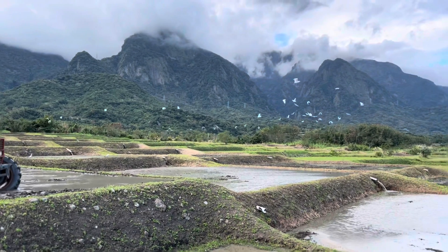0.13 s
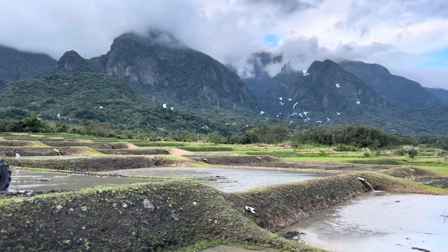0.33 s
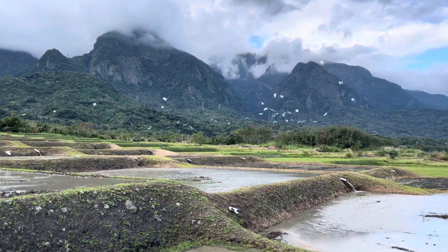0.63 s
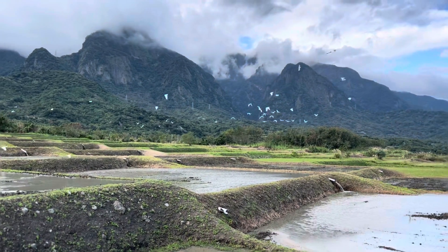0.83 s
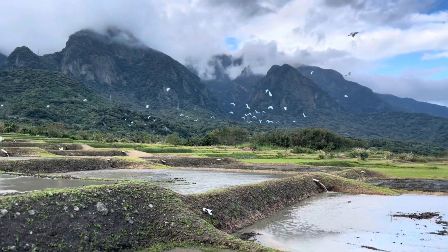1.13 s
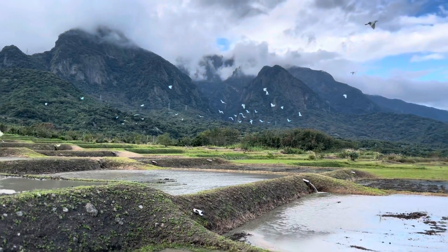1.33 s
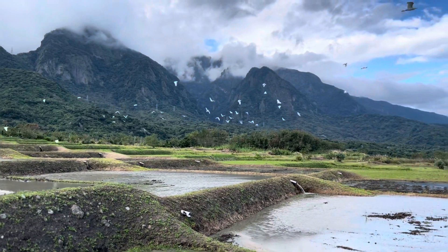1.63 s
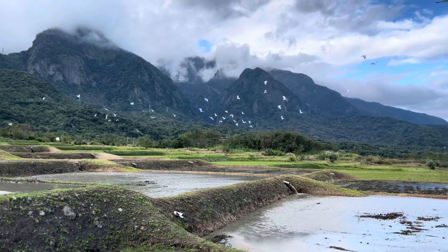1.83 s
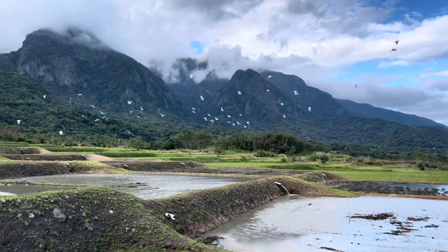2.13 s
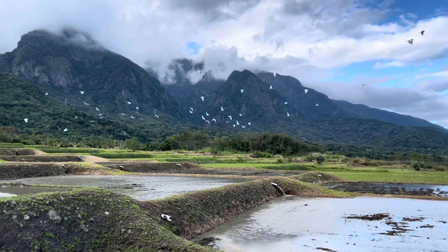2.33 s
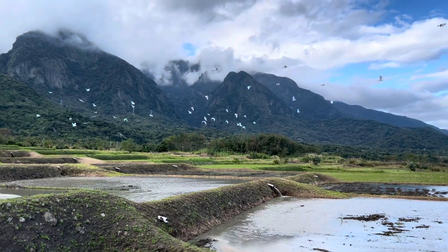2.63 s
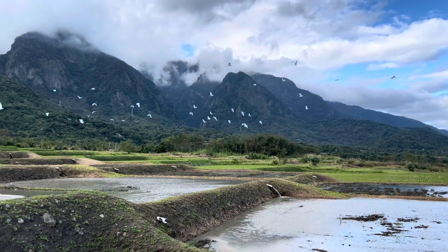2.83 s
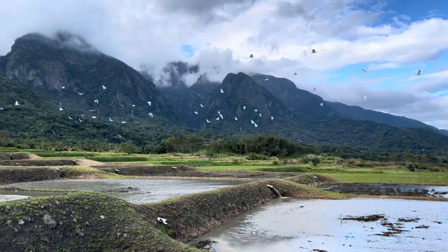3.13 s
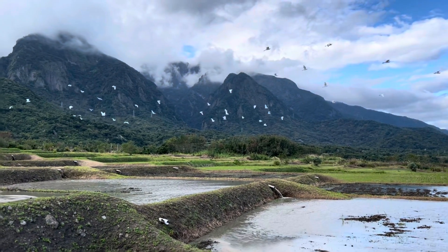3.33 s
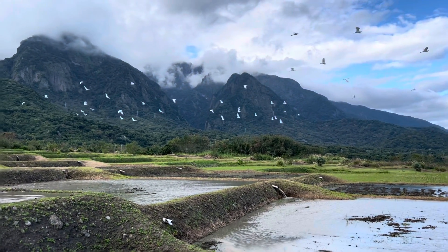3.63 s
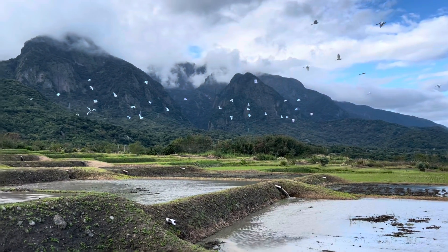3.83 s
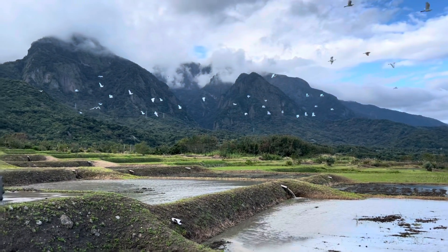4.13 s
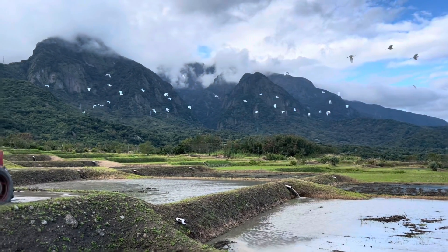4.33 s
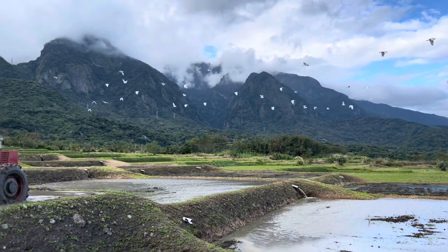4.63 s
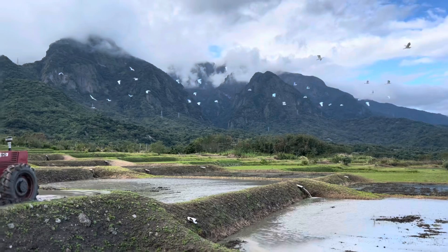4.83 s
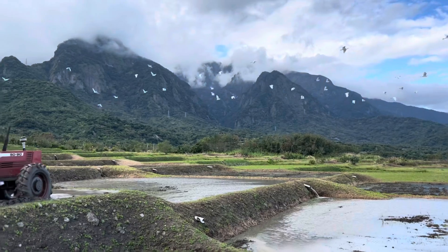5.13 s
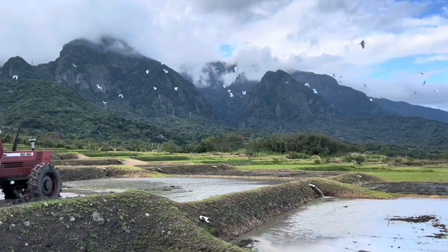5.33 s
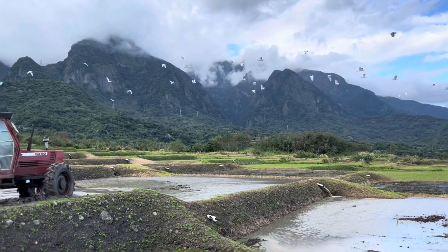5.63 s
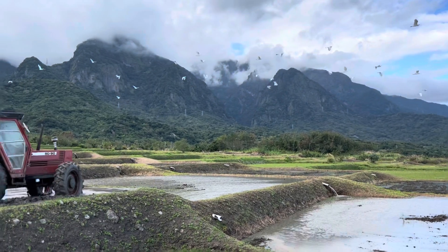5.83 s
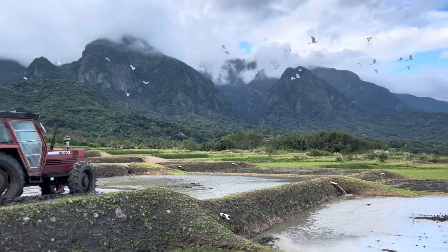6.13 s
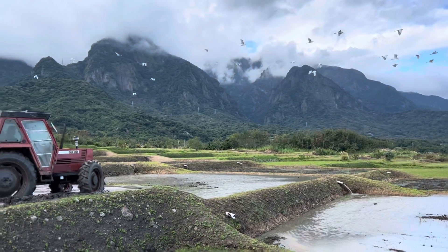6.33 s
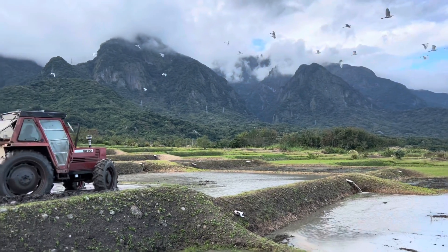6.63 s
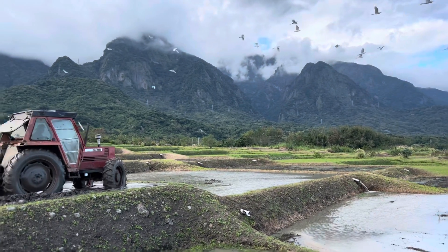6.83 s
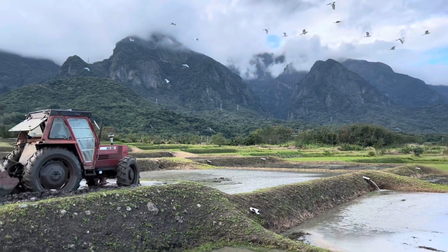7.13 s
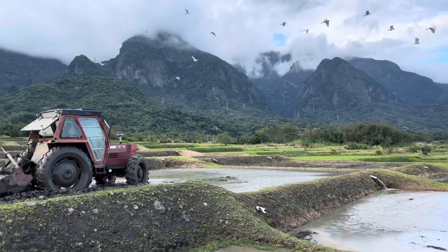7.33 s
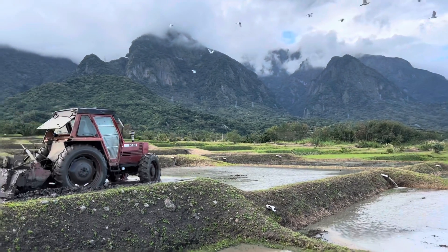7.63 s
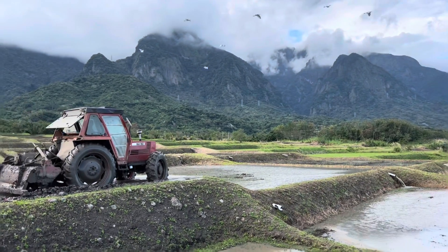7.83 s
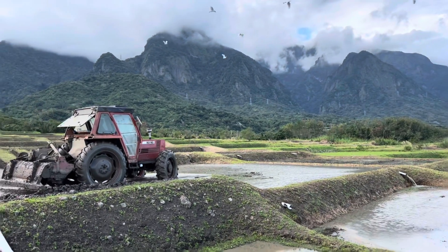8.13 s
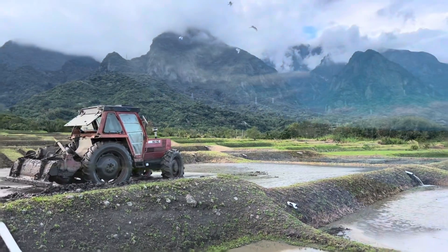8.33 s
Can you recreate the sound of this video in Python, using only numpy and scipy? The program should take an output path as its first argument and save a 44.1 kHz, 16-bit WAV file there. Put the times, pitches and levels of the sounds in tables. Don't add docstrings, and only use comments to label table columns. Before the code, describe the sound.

Wind noise dominates from 0 s: gusts press on a small stereo microphone with low rumble, fluttering roar, dull thumps and sharp little cracks, especially strong around 0.4-1.1 s, and at about 2.2 s. Underneath, a diesel tractor works continuously at a distance in a flooded field, leaning left. Its deep notes are masked, leaving a fast, steady pulsing hiss, mid-range block hum, metallic rattle and a smooth fine spray of thrown water. Wind eases somewhat after 2.5 s but keeps snapping and thudding, with dips near 2.6 and 4.3 s. From roughly 5 s the gears take load, whining narrowly, and the casing rings brighter in short flares, heaviest around 6.6 s. After 7.3 s the load eases and the tractor hiss fades, while short strong gusts near 7.4 and 8.1 s alternate with sudden lulls until the end at 8.5 s.

```python
import sys
import numpy as np
from scipy import signal
from scipy.fft import rfft, irfft, next_fast_len
from scipy.io import wavfile
from scipy.ndimage import uniform_filter1d

SR = 44100
rng = np.random.default_rng(int(sys.argv[2]) if len(sys.argv) > 2 else 0)


def decibels_to_gain(level_db):
    exponent = np.asarray(level_db, float) / 20
    return 10 ** exponent


def store_pcm(level_fs):
    pcm = np.round(np.clip(level_fs, -1, 1) * 32767).astype(np.int16)
    wavfile.write(sys.argv[1], SR, np.atleast_2d(pcm).T)


N = 374850
SIZE = next_fast_len(N)
HZ = np.maximum(np.arange(SIZE // 2 + 1) * SR / SIZE, 1)


def rms_one(x):
    return x / np.sqrt(np.mean(x ** 2) + 1e-20)


def in_time(rows):
    s, *columns = np.transpose(rows)
    return [np.interp(np.arange(N) / SR, s, c) for c in columns]


def at_hz(points, hz, column=1):
    points = np.array(points)
    return np.interp(np.log(hz), np.log(points[:, 0]), points[:, column])


def swells(rows):
    s, half_s, first_db, second_db = np.transpose(rows)[..., None]
    t = np.arange(0, N + 64, 64)
    hump = np.cos(np.clip((t / SR - s) / half_s, -1, 1) * np.pi / 2) ** 2
    return [np.interp(np.arange(N), t, np.sum(db * hump, axis=0)) for db in (first_db, second_db)]


def drift(rate_hz):
    r = np.exp(-40 * np.pi * rate_hz / SR)
    slow = signal.lfilter([1], [1, -2 * r, r * r], rng.standard_normal(N // 20 + 4002))[4000:]
    return np.interp(np.arange(N) / 20, np.arange(len(slow)), rms_one(slow))


def resonance(x, hz, width_hz):
    r = np.exp(-np.pi * width_hz / SR)
    return signal.lfilter([(1 - r * r) / 2, 0, (r * r - 1) / 2],
                          [1, -2 * r * np.cos(2 * np.pi * hz / SR), r * r], x)


def ringing(noise, hz, width_hz):
    return rms_one(resonance(resonance(noise, hz, width_hz), hz, width_hz))


# [pitch_hz, share in step (leans left), share a quarter
LEAN = [(60, .02, 0.48), (200, .05, 0.51), (500, 0.37, 0.64), (780, 0.56, 0.36), (1100, -0.15, 0.3),
        (1300, -0.43, -0.011), (1860, 0.24, -0.25), (2300, -0.13, -.5), (2860, 1, 1), (3300, 1, .2),
        (3600, 0.67, -.4), (3950, .1, 0), (4400, -0.23, .5), (4870, -0.0098, -.4), (5300, 0.41, -.2),
        (5700, 0.92, 0), (6300, 0.6, -.3), (7000, -.1, .3), (7600, 0, .1), (8200, .05, -.6),
        (8800, .02, -.5), (10000, .02, 0), (11300, .02, .5), (12200, .02, .5), (16000, .02, 0)]


def ports(mid_db, side_db, side_gain_db, gate=1, lean=LEAN):
    first, second = rfft(rng.standard_normal((2, N)) * gate, SIZE)
    tied = at_hz(lean, HZ) + 1j * at_hz(lean, HZ, column=2)
    tied = tied / np.maximum(abs(tied), 1)
    free = np.sqrt(np.clip(1 - abs(tied) ** 2, 0, 1))
    inside = (HZ > mid_db[0][0]) & (HZ < mid_db[-1][0])
    mid = decibels_to_gain(at_hz(mid_db, HZ)) * inside
    side = decibels_to_gain(at_hz(side_db, HZ) + side_gain_db) * inside * (tied * first + free * second)
    return np.array([mid * first + side, mid * first - side]) / np.sqrt(np.mean(mid ** 2))


def heard(spectra):
    return irfft(spectra, SIZE)[..., :N]


def band(spectra, low_hz, high_hz):
    place = np.log(HZ / low_hz) / np.log(high_hz / low_hz)
    return heard(spectra * np.sin(np.pi * np.clip(place, 0, 1)))


def two_ports(x, lag_ms, lean_db):
    late = np.interp(np.arange(N) - lag_ms * SR / 1000, np.arange(N), x)
    return np.array([x * decibels_to_gain(lean_db), late * decibels_to_gain(-lean_db)])


def bursts(per_s, spread_db, fade_s):
    born = rng.random(N) < per_s * decibels_to_gain(3.5 * drift(18)) / SR
    sizes = decibels_to_gain(spread_db * np.minimum(rng.exponential(1, N), 3.0))
    return rms_one(signal.lfilter([1], [1, -np.exp(-1 / (fade_s * SR))], born * sizes + 1e-18))


def evened(x, over_s, share):
    power = uniform_filter1d(np.mean(x ** 2, axis=0), size=round(over_s * SR))
    return x * (power / np.mean(power) + 0.023) ** (-share / 2)


# [time_s, level_db, brightness_db]
WIND = [(0.0, -7.5, 2.2), (0.65, -18, 7), (1.31, -12, 6), (1.96, -17, 7), (2.62, -12, 4), (3.27, -11, 3.5),
        (3.92, -21, 6.5), (4.58, -18, 6.5), (5.23, -18, 5.5), (5.88, -22.5, 6), (6.54, -16.5, 2),
        (7.19, -20.5, 4), (7.85, -22.5, 1.5), (8.5, -19, 3.5)]
# [middle_s, half_length_s, level_db,
# brightness_db]
GUSTS = [(0.579, 0.16, 5.5, 1), (0.808, 0.019, 9.5, -1.5), (0.993, 0.04, 5, -2), (1.626, 0.043, 3, -0.5),
         (1.686, 0.091, 4.5, -3), (1.771, 0.034, 5, -2), (1.956, 0.026, 6.5, -8), (2.18, 0.061, 2, 3),
         (2.33, 0.025, 4.5, 1.5), (2.545, 0.023, -0.5, 7), (2.575, 0.017, -3.5, 5),
         (3.462, 0.031, 3.5, -0.5), (3.687, 0.17, 3, 0.5), (3.826, 0.048, 3, -1.5), (3.946, 0.04, 3, 1.5),
         (4.2, 0.042, 3.5, 2.5), (4.55, 0.054, 2.5, 1), (4.714, 0.071, 3.5, 0.5), (5.348, 0.11, 3, 1),
         (6.001, 0.044, 6.5, -2), (6.351, 0.057, 3.5, 0), (7.114, 0.027, 7.5, -2), (7.433, 0.028, 10, -1.5),
         (7.937, 0.052, 7, -7), (8.092, 0.038, 11, -2.5), (8.286, 0.034, 4.5, 2), (8.366, 0.028, 6, -2),
         (2.22, 0.11, -2, 2.5), (3.393, 0.077, -0.5, 2.5), (7.726, 0.032, 2, -7), (1.01, 0.024, 0.5, -4),
          (1.086, 0.12, 4.5, -5), (2.713, .05, -2.5, 6), (2.877, .04, 2.5, -8), (3.042, 0.037, -1.5, -5.5),
          (4.955, 0.059, 3, -5.5), (6.48, 0.077, 4, 2), (6.71, 0.054, 2, 2), (7.37, 0.046, 3.5, 0),
          (0.335, 0.047, 0, 4.5), (0.885, 0.021, 2, 1), (3.58, 0.093, 0, 1.5), (8.067, 0.043, 0.5, 3)]
LULLS = [(0.078, 0.087, -6, 2), (0.93, 0.034, -5.5, -2), (1.215, 0.22, -2.5, -5), (1.317, 0.081, -1.5, 2.5),
         (2.632, 0.12, -9, 6.5), (3.132, 0.1, -2, -4), (3.257, 0.026, -4.5, 5), (4.346, 0.072, -4, 3.5),
         (6.131, 0.024, -7.5, 4), (6.597, 0.11, -4.5, 3), (6.842, 0.14, -4, 0.5), (7.043, 0.039, -5, 5),
         (7.622, 0.13, -8, 4.5), (7.769, 0.027, -6, 2.5), (7.862, .05, -2, 1.5), (8.148, 0.04, -17, 7),
         (8.185, 0.032, -12, 7), (8.23, 0.079, -5, 2.5)]
# [pitch_hz, level_db per Hz]
WIND_MID = [(15, -44), (25, -36), (53, 0.5), (95, 0), (266, -7.5), (643, -14), (991, -21), (1560, -24),
            (2600, -35.5), (3400, -46.5), (4420, -53), (7480, -120)]
WIND_SIDE = [(15, -44), (25, -18), (44, 7), (64, -2), (141, -1.5), (307, -6.5), (557, -5), (1010, -11),
             (1380, -15.5), (1840, -11.5), (2080, -20), (2940, -54), (3400, -28), (4420, -60), (7480, -120)]
# [pitch_hz, share 0-1]
GRAINY = [(60, 0.12), (150, 0.63), (400, 0.41), (1200, 0.49), (2200, 0.87), (3400, 0.47)]
GUST_HZ = [96.5, 420, 1670]


def wind(shared_db=0.93, own_db=1.82):
    side_gain_db = -11.5
    level_db, bright_db = np.array(in_time(WIND)) + swells(GUSTS + LULLS)
    smooth = ports(WIND_MID, WIND_SIDE, side_gain_db)
    broken = np.clip((level_db + 29.5) / 10.5, 0, 1)
    gate = np.sqrt(broken) * bursts(per_s=300, spread_db=1.5, fade_s=0.0012) + 1 - broken
    grains = ports(WIND_MID, WIND_SIDE, side_gain_db, gate=gate)
    share = np.clip(at_hz(GRAINY, HZ), 0, 1)
    spectra = np.sqrt(1 - share) * smooth + np.sqrt(share) * grains
    lumps = drift(41.0) + 0.81 * drift(24.0)
    out = 0
    centres = 20 * 2 ** np.arange(0, 8.5, .5)
    for low, hz, high in zip(centres, centres[1:], centres[2:]):
        follows = np.interp(np.log(hz), np.log(GUST_HZ), [0, 0.36, 1.46])
        flicker = decibels_to_gain(shared_db * lumps + own_db * drift(14.0))
        gust = decibels_to_gain(level_db + follows * (bright_db - 5.5))
        flickering = rms_one(flicker) * band(spectra, low, high)
        out = out + gust * evened(flickering, over_s=0.094, share=0.41)
    return decibels_to_gain(-1.82) * out


# [time_s, hiss level_db]
TRACTOR = [(0.0, -43), (1.02, -41.5), (1.09, -43), (2.77, -42), (4.0, -43.5), (5.87, -44), (7.36, -46),
           (7.41, -47.5), (7.6, -46.5), (7.69, -50), (8.05, -49.5), (8.12, -48), (8.17, -51), (8.26, -52.5),
           (8.31, -49), (8.36, -53.5), (8.5, -55)]
# [time_s, turn towards the listener 0-1, gear load_db]
BEARING = [
    (0, 0.35, -18),
    (2, 0.21, -10),
    (4, 0.28, -17),
    (4.9, 0.46, -6),
    (5.6, 0.65, -4),
    (6.6, 0.78, -1),
    (7.4, 0.81, -9.5),
    (8.5, 0.82, -13),
]


def tractor_course():
    hiss_db, = in_time(TRACTOR)
    turn, load_db = in_time(BEARING)
    return hiss_db, turn, load_db


CYLINDERS_DB = [5, 7.5, -5, 5.5]


def firings(depth):
    firings_per_s = 66.2
    turns = np.cumsum(firings_per_s * (1 + 0.0042 * drift(4.6))) / SR
    strength = decibels_to_gain(np.array(CYLINDERS_DB)[turns.astype(int) % len(CYLINDERS_DB)])
    gate = uniform_filter1d(strength * np.exp(-2.5 * (turns % 1)), size=60)
    return rms_one(1 - depth + depth * gate / np.mean(gate))


FIRING_DEPTH = 0.23

# [pitch_hz, level_db per Hz]
FAR_MID = [(1940, -11), (3300, -6.5), (3880, -0.5), (4270, -2), (4630, -9), (4810, -16), (5240, -8.5),
           (5860, -3.5), (6360, -10.5), (7780, -11), (8780, -18.5), (9200, -19.5), (12000, -77),
           (20200, -120)]
FAR_SIDE = [(1940, -37), (3300, -2.5), (3990, -18), (4490, 0.5), (5160, -11), (5990, 1.5), (6560, -15),
            (7080, -7), (7820, -15), (9200, -9), (12000, -38), (20200, -120)]
NEAR_MID = [(1940, -42), (3300, -18), (3990, -5), (4900, -3.5), (5240, -3.5), (6360, -6), (6900, -6),
            (7650, -13.5), (8590, -13), (9200, -18), (12000, -59), (20200, -120)]
NEAR_SIDE = [(1940, -28), (3300, 5), (3520, -8), (3750, -1), (4590, -6), (4900, -6), (5160, 0), (5430, 6),
             (5670, 1), (6530, -3), (7170, -12), (9200, -11), (12000, -44), (20200, -120)]
# [pitch_hz, share in step, share a quarter cycle early]
NEAR_LEAN = [(1940, .1, .2), (3000, .3, .4), (3500, .1, 0), (4000, .1, -.4), (4700, .3, -.2),
             (5600, .9, -.1), (6440, 0.44, 0), (7200, .1, .1), (8200, .05, -.5), (9000, .02, -.4),
             (16000, .02, 0)]


def engine_hiss(turn):
    angle = np.clip(turn, 0, 1) * np.pi / 2
    far = heard(ports(FAR_MID, FAR_SIDE, -2.5))
    near = heard(ports(NEAR_MID, NEAR_SIDE, -2.5, lean=NEAR_LEAN))
    unsteady = decibels_to_gain(0.51 * drift(13.0) + 0.61 * drift(25))
    return (np.cos(angle) * far + np.sin(angle) * near) * firings(.6 * FIRING_DEPTH) * unsteady


# [pitch_hz, width_hz]
CASING = [(5270, 220), (5620, 130)]
RINGS_DB = [-18, -7.5]
RINGS_TURN_DB = [16.5, 4]
RINGS_FADE = [0.87, -0.47]
# [middle_s, half_length_s, lower ring level_db, upper ring level_db]
FLARES = [(5.42, .05, 9, 1), (5.6, 0.078, 6, 1), (5.77, .05, 6, 1), (5.92, .06, 3, 1), (6.12, .08, 7, 4),
          (6.3, .06, 3, 3), (6.5, .1, 2, 6), (6.85, .1, -1, -2), (7.05, .05, 4, 1), (7.312, .07, 7, 3),
          (7.56, .06, 1, 4), (7.85, .08, -1, 5), (8.083, 0.083, 6, 6.5), (8.21, .03, 2, 3),
          (8.446, .1, -1, 4), (8.2, 0.77, 0, 3.5), (6.3, 1.2, 1.5, 2)]


def casing_rings(hiss_db, turn):
    rattle = rng.standard_normal((2, N)) * firings(FIRING_DEPTH)
    settings = zip(rattle, CASING, RINGS_DB, RINGS_TURN_DB, RINGS_FADE, swells(FLARES))
    out = 0
    for noise, (hz, width_hz), ring_db, rise_db, fade, flare_db in settings:
        level_db = ring_db + rise_db * turn + fade * (hiss_db + 48.5) + flare_db
        level_db = level_db - 7 + 0.4 * drift(2.0) + 0.75 * drift(8.6)
        out = out + decibels_to_gain(level_db) * ringing(noise, hz, width_hz)
    return out


# [pitch_hz, level_db per Hz]
BODY = [(150, -39), (400, -32), (800, 6), (1300, 11.5), (1700, -0.5), (2000, 5.5), (2200, 2.5), (2500, 7),
        (2900, 2.5), (3200, -3.5)]


def engine_block():
    return heard(ports(BODY, BODY, -0.51)) * firings(FIRING_DEPTH)


# [pitch_hz, width_hz, level_db]
GEARS = [(852, 18, -37), (1364, 99, -39), (2440, 250, -43.5)]


def gear_whine(load_db):
    out = 0
    for (hz, width_hz, level_db), noise in zip(GEARS, rng.standard_normal((len(GEARS), N))):
        out = out + decibels_to_gain(level_db + load_db + 2.1 * drift(3.2)) * ringing(noise, hz, width_hz)
    return out


def tractor():
    hiss_db, turn, load_db = tractor_course()
    block_db = hiss_db + 12 - 15 * turn
    lag_ms = 0.46 * (1.1 - 0.69 * turn ** 2)
    hiss = engine_hiss(turn)
    ring = casing_rings(hiss_db, turn) * decibels_to_gain([[4.5], [-8]])
    direct, scattered = engine_block()
    below = two_ports(decibels_to_gain(block_db - 2.0) * direct + gear_whine(load_db), lag_ms, lean_db=3.5)
    below = below + decibels_to_gain(block_db) * scattered * np.array([[1], [-.3]])
    return decibels_to_gain(hiss_db + 2.2) * (hiss + ring) + below


# [pitch_hz, level_db per Hz]
SPRAY_MID = [(8600, -30), (9000, -22), (9600, -37), (10600, -16.5), (11200, 0), (11800, 2), (13000, 1.5),
             (14500, -2), (15000, -4), (15300, -20), (15700, -40)]
SPRAY_SIDE = [(8600, -23), (9000, -5), (10000, -2), (11500, 5.5), (12200, -4), (12800, -19), (14200, -14),
              (14700, -5), (15300, -11), (15800, -11), (15900, -30)]


def spray():
    hiss_db, turn, _ = tractor_course()
    fine = heard(ports(SPRAY_MID, SPRAY_SIDE, -.7))
    level_db = 0.6 * (hiss_db + 44.6) - 49 - 4 * turn
    return decibels_to_gain(level_db + 0.36 * drift(12) + 0.92 * drift(30)) * fine


# [start_s, peak level_db, brightness_db]
POPS = [(0.031, -18, -18), (0.114, -4, -20), (0.145, -18, -20), (0.402, -14, -20), (0.499, -28, -14),
        (0.541, -14, -13), (0.98, -5.5, -0.5), (1.755, -11, -13), (2.758, -6, -14), (2.979, -1, -19),
        (3.333, -31, -11), (3.496, -6, -1), (3.772, -6, -10), (4.589, -13, -11), (4.702, -9, -14),
        (5.562, -16, -16), (5.83, -14, -15), (5.981, -19, -15), (6.296, -10, -7), (6.352, -8, -15),
        (6.476, -21, -20), (6.6, -15, -4), (6.703, -11, -14), (6.923, -12.5, -5), (7.429, -16, -18),
        (7.825, -10.5, -27), (7.98, -19, -20), (8.06, -13.5, -21), (8.096, -10, -17), (8.375, -7, -21)]
# [start_s, peak level_db]
SNAPS = [(0.1867, -16), (0.234, -10), (0.3124, -11), (0.5432, -10), (0.594, -16), (0.6845, -6), (0.764, -8),
         (0.9813, -9), (1.035, -8), (1.4232, -11), (2.034, -6.5), (2.3322, -4), (2.456, -8), (2.538, -13),
         (2.607, -7.5), (2.759, -4), (2.841, -8.5), (2.941, -7), (3.2115, -7), (3.3974, -10), (3.517, -18),
         (3.5808, -13), (3.6383, -4), (3.7105, -21), (3.7569, -12.5), (4.4808, -10.5), (4.8828, -15),
         (5.1902, -10), (5.242, -21), (8.374, -27)]
# [start_s, peak level_db]
FLICKS = [(0.332, -19), (0.867, -13), (0.8984, -13), (1.054, -19), (1.0829, -12), (1.123, -14),
          (1.4974, -11), (1.5962, -8), (2.1797, -14), (2.5404, -17), (3.0065, -6), (3.265, -14),
          (3.368, -11), (3.48, -23), (3.546, -10), (3.772, -8), (3.8115, -13), (4.1629, -14), (4.634, -25),
          (4.8648, -11), (4.991, -28), (5.3423, -17), (5.3885, -10), (5.4779, -12), (5.527, -27),
          (5.7748, -17), (5.8885, -24), (6.0197, -27), (6.2457, -19), (6.4507, -18), (6.7444, -23),
          (7.2037, -25), (7.9982, -27), (8.0244, -33), (8.2763, -25), (8.289, -24)]


def pops():
    lag_ms, lean_db = .55, 3.5
    out = np.zeros((2, N))
    t = np.arange(round(0.028 * SR)) / SR
    dull = signal.butter(3, [350, 950], "band", fs=SR, output="sos")
    bright = signal.butter(4, [1150, 2800], "band", fs=SR, output="sos")
    snaps = [(s, db - 1.5, 0.5) for s, db in SNAPS]
    flicks = [(s, db - 2, -0.5) for s, db in FLICKS]
    for s, peak_db, bright_db in POPS + snaps + flicks:
        puff = rng.standard_normal((2, len(t)))
        puff = puff + 0.94 * puff[0]
        puff = puff * np.exp(-t / 0.0012) * np.minimum(t / 0.00061, 1)
        puff[:, 8] += 25 * np.sign(puff[0, 8])
        low, high = signal.sosfilt(dull, puff), signal.sosfilt(bright, puff)
        burst = low / abs(low).max() + decibels_to_gain(bright_db) * high / abs(high).max()
        burst[1] = np.roll(burst[1], round(lag_ms * SR / 1000))
        burst = burst * decibels_to_gain([[lean_db], [-lean_db]])
        push = np.sin(2 * np.pi * rng.uniform(110, 333.6) * t) * np.exp(-t / 0.028)
        burst = burst + 0.5 * push * np.cos(np.pi / 2 * t / t[-1])
        at = round(s * SR)
        out[:, at:at + len(t)] += (decibels_to_gain(min(peak_db, -6) - 0.8) * burst)[:, :N - at]
    return out


# [start_s, peak level_db, pitch_hz]
THUMPS = [(0.372, -4, 98), (0.575, 2, 129), (0.801, -6, 80.7), (0.843, -8, 105), (0.966, 1.5, 167),
          (2.166, 0, 109), (2.525, -11, 178), (2.662, -12, 83.4), (3.374, -6, 154), (3.442, -8, 105),
          (4.164, -6.5, 245), (4.374, -10, 129), (4.531, -12, 102), (4.551, -1, 137), (5.288, -6, 108),
          (5.385, -22, 204), (5.956, -12, 207), (6.173, -25, 132), (6.294, -7, 83.4), (6.362, 1, 113),
          (6.704, -4, 129), (6.919, -19, 153), (6.985, -9, 172), (7.097, -14, 99), (7.201, -12, 128),
          (7.309, -11, 151), (7.428, -6, 322), (7.579, -13, 80.7), (7.919, -11, 124), (8.088, -12, 102),
          (8.202, -21, 177)]


def thumps():
    rise_s, fade_s, sag = 0.0032, .012, 0.36
    out = np.zeros(N + SR)
    t = np.arange(round(.08 * SR)) / SR
    shape = (1 - np.exp(-t / rise_s)) * np.exp(-t / fade_s)
    shape = shape / shape.max()
    for s, peak_db, pitch_hz in THUMPS:
        at = round(s * SR)
        cycles = pitch_hz * t * (1 - sag * t / 0.041)
        out[at:at + len(t)] += decibels_to_gain(peak_db - 7) * shape * np.sin(2 * np.pi * cycles)
    return out[:N]


def scene():
    return wind() + tractor() + spray() + pops() + thumps()


def band_limit(x):
    return signal.sosfilt(signal.butter(12, 15830, fs=SR, output="sos"), x)


def record(dry):
    b, a = signal.iirnotch(5500, 140, fs=SR)
    notched = signal.lfilter(b, a, dry)
    rounded = 0.96 * np.tanh(notched / 1.16)
    return band_limit(rounded)


dry = scene()
out = record(dry)
store_pcm(out)
```